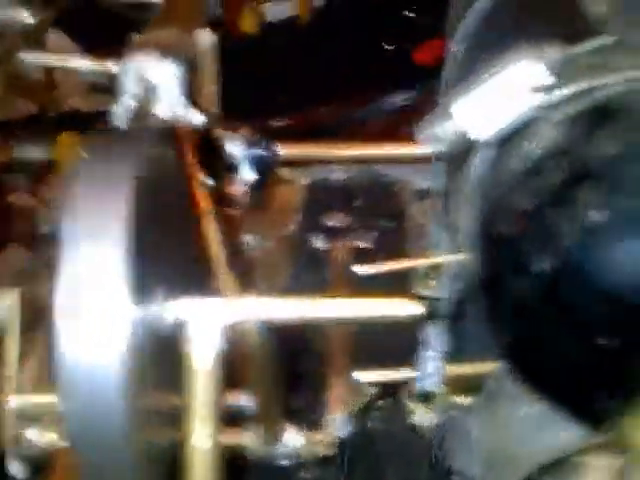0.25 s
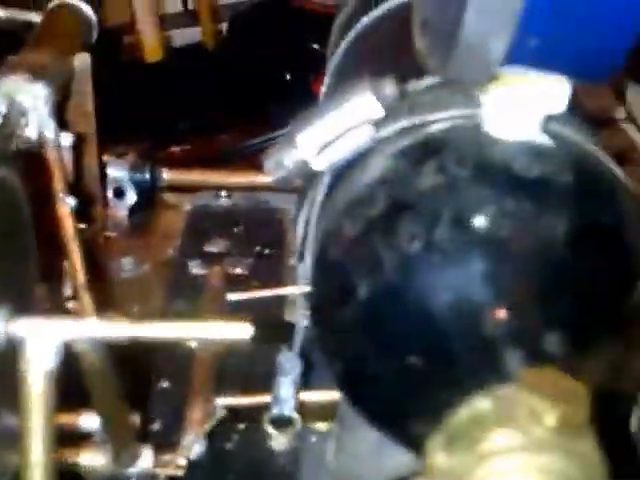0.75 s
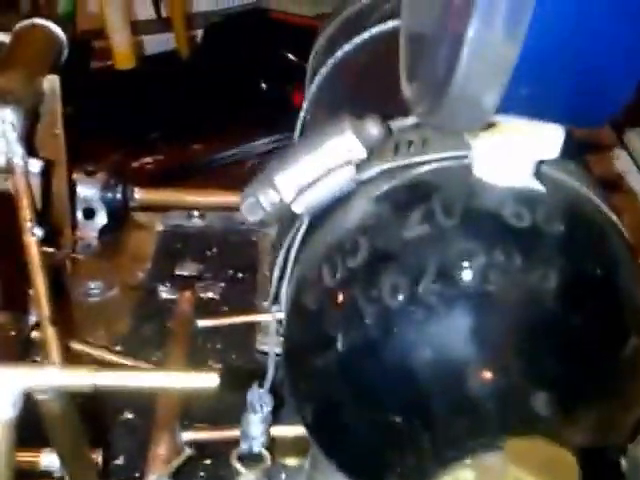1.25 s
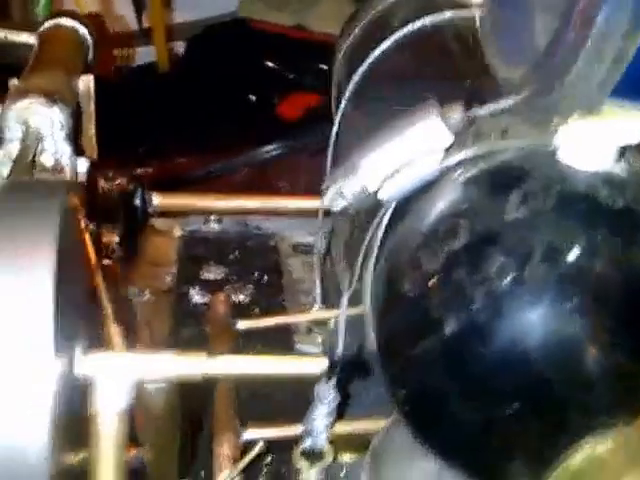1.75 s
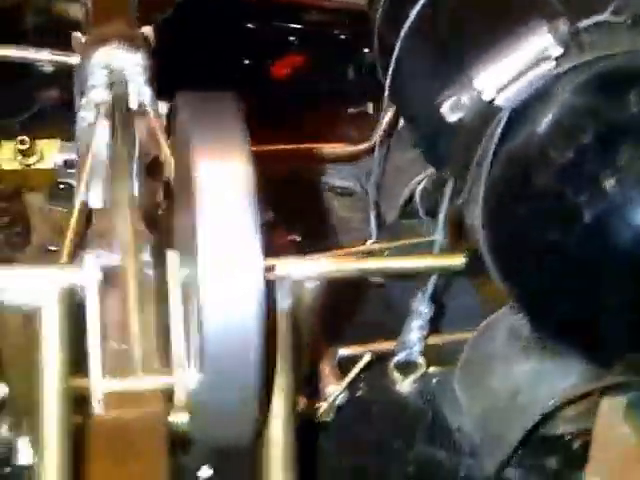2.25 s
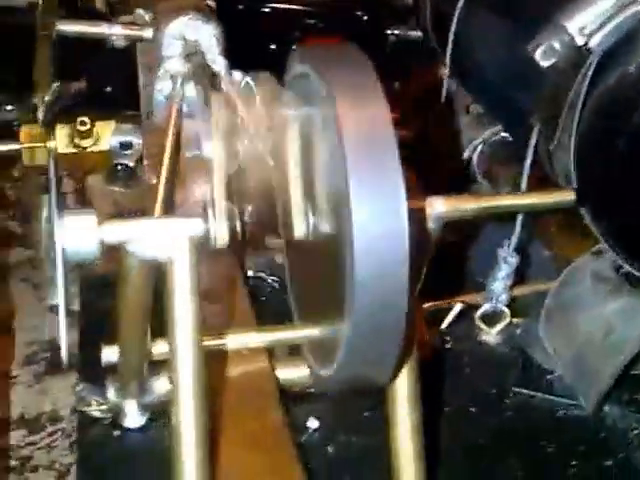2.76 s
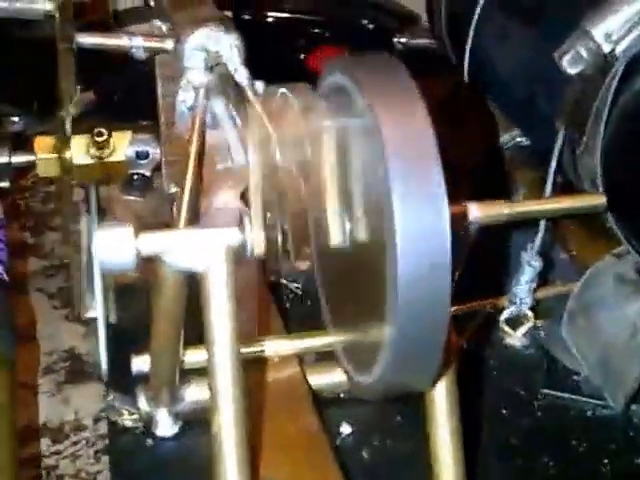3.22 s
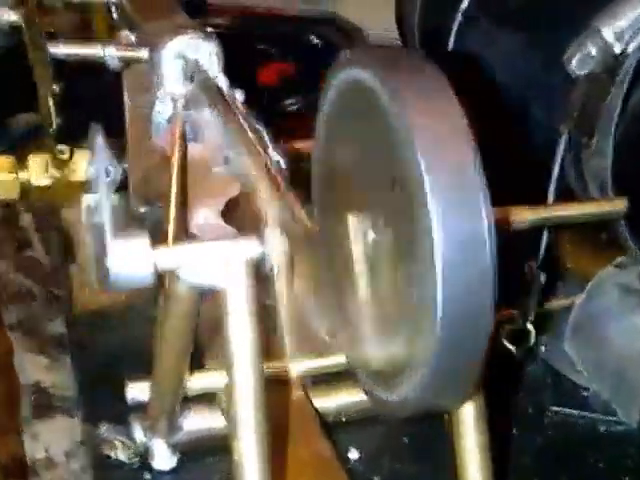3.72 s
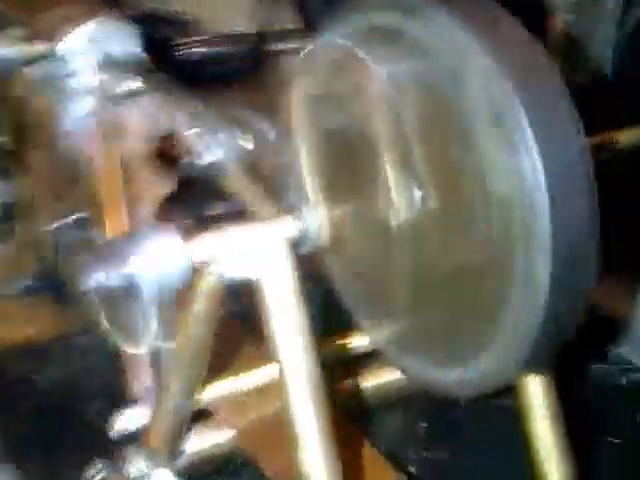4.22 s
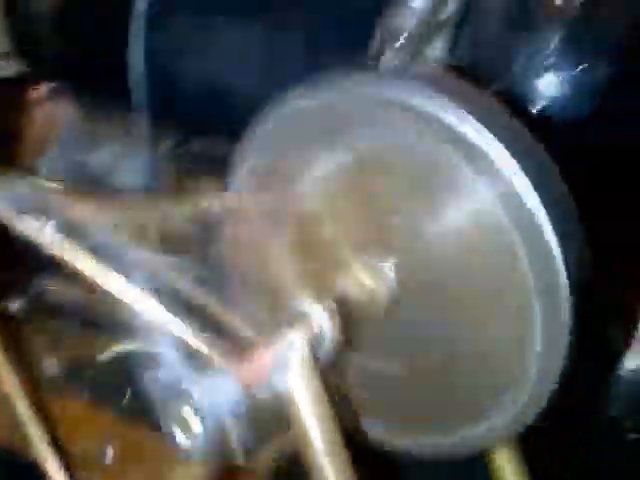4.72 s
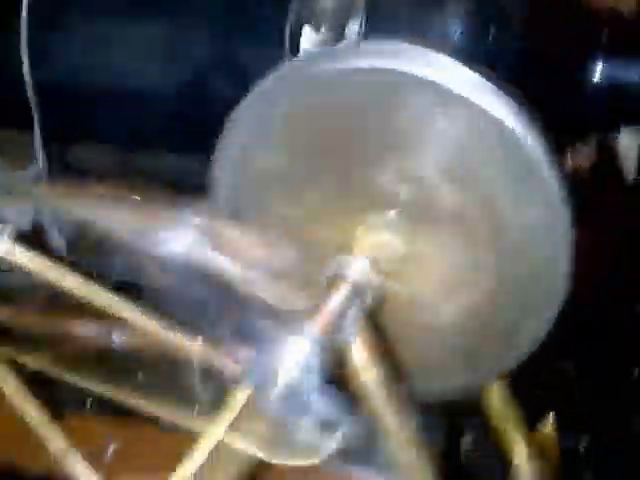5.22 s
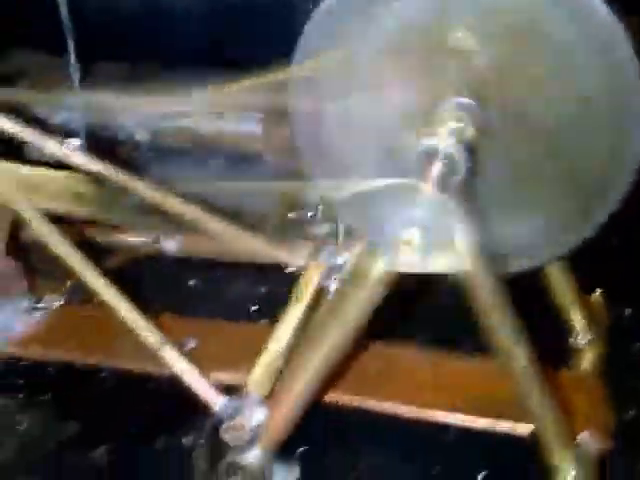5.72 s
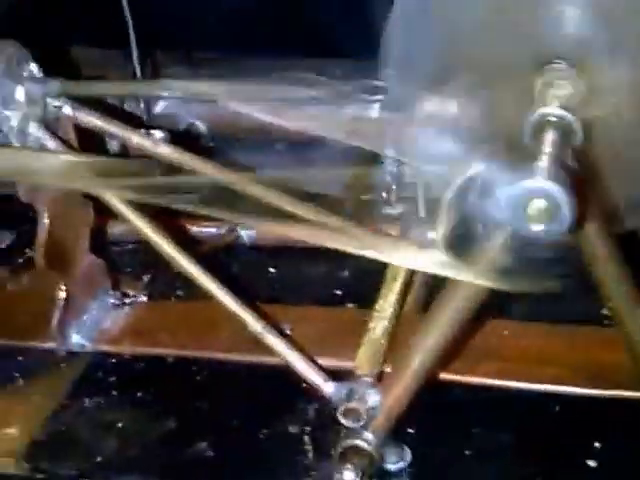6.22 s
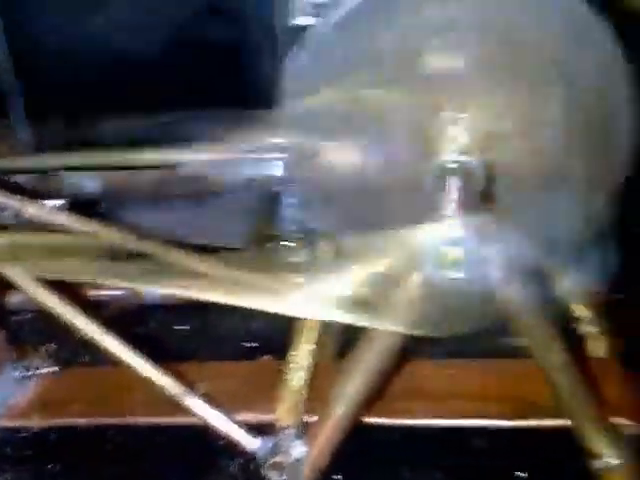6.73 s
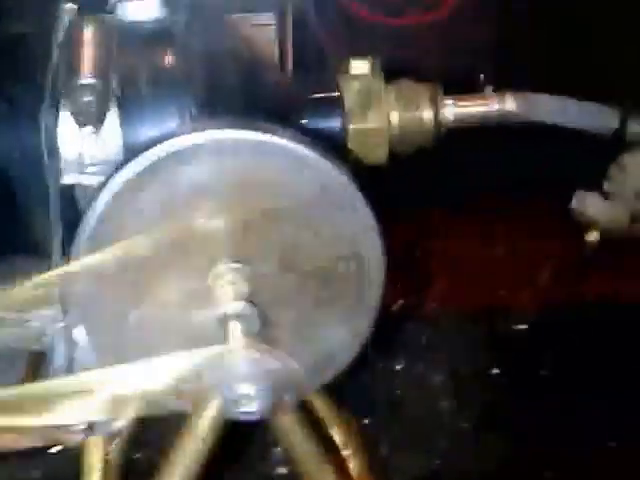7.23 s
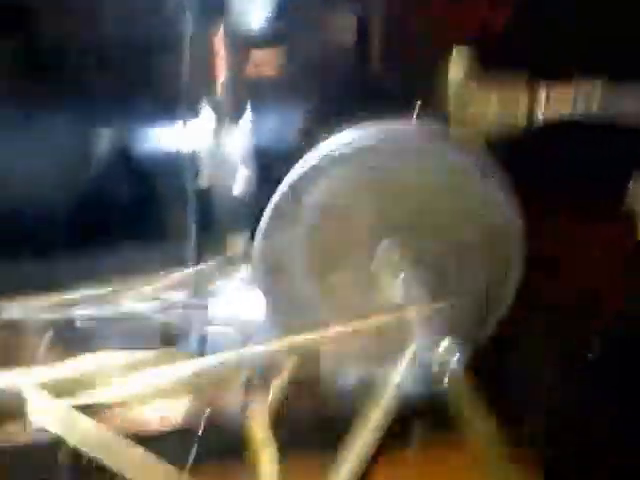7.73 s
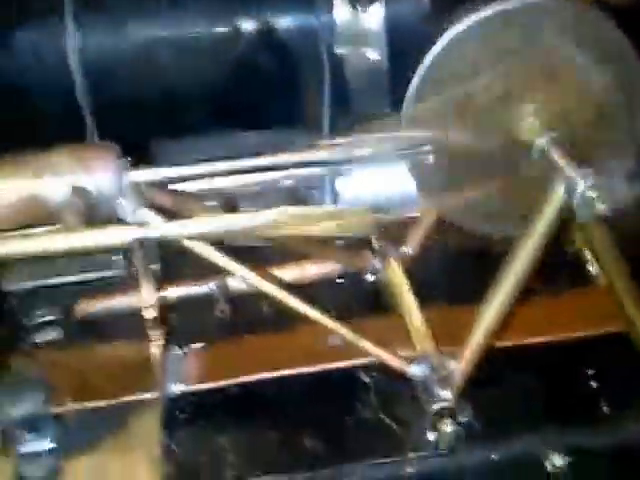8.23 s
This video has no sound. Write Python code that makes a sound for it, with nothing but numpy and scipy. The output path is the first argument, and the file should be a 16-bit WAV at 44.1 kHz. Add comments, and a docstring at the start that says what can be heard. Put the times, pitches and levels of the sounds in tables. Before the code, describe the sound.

A small homemade piston engine runs on compressed air at a workbench, with a fast, even clatter of loose metal joints, low valve thumps and hissing, faintly whistling exhaust puffs. A leak hisses underneath. For the first half, exhaust air buffets the close microphone. As it moves around the engine, the buffeting stops, squeaky spits and harder clacks come through, and a brighter rattle joins near the end.

```python
"""At a workbench, close up: a small homemade piston engine on compressed air, about 11 turns a second.
The microphone travels slowly around it. Each turn the valve thumps, the exhaust port spits, hisses and
whistles, and loose joints knock the base, frame, air tank and rods. An air fitting leaks throughout, and
the slide bars rattle as the microphone comes round to them. For the first four seconds the exhaust blows
on the microphone, and the strongest buffets duck the recorder's gain."""
import sys
import numpy as np
from scipy import signal
from scipy.fft import rfft, irfft, next_fast_len
from scipy.io import wavfile
from scipy.ndimage import uniform_filter1d, minimum_filter1d

SR = 44100
rng = np.random.default_rng(int(sys.argv[2]) if len(sys.argv) > 2 else 0)


def generate_wav(sig):
    """Save sig (samples, or channels by samples) to the path in sys.argv[1] as 16-bit PCM at SR."""
    pcm = np.round(np.clip(np.atleast_2d(sig).T, -1, 1) * 32767).astype(np.int16)
    wavfile.write(sys.argv[1], SR, pcm)


N = 373086
TIME = np.arange(N) / SR

# Levels in the tables are relative; each source may add its own gain.
# flywheel speed: t/s, speed/(turns per s)
FLYWHEEL_SPEED = [(0.0, 11.365), (0.9, 10.962), (2.5, 11.08), (3.4, 10.973), (4.3, 11.275), (5.4, 11.136),
                  (6.9, 11.304), (7.7, 10.896), (8.46, 10.84)]
# the two exhaust strokes of a turn: port opens/deg, shuts/deg, flow/dB, swell over the stroke/dB
EXHAUST_STROKES = [(5, 140, -0.5, 4.5), (154, 234, -2, -7)]

# loose draught around the microphone: t/s, level/dB
DRAUGHT_LEVEL = [(0, -25.5), (1.3, -36), (2.4, -26), (3.1, -41), (3.9, -43), (4.4, -43.5), (5.2, -48),
                 (8.46, -56.5)]
# its spectrum: f/Hz, level/dB
DRAUGHT_SPECTRUM = [(12, -34.5), (30, -13), (55, -1.5), (130, -0.5), (250, -6), (450, -14.5), (900, -51)]
# leak at the air fitting, from where the microphone is: t/s, level/dB
LEAK_LEVEL = [(0, -36), (2.3, -41.5), (4.5, -39.5), (5.8, -36), (6.8, -33.5), (7.4, -33.5), (8.0, -34.5),
              (8.46, -31)]
# its spectrum: f/Hz, level/dB
LEAK_SPECTRUM = [(40, -35), (300, -5.5), (1000, -3), (2600, -5), (3700, -6.5), (4600, -8), (5600, -6.5),
                 (6600, -9), (7500, -30.5)]
# its thin tone, heard near the cylinder: t/s, level/dB, f/Hz
LEAK_SINGING = [(0, -60, 4700), (5.3, -54, 4760), (6.1, -45, 4590), (6.9, -44.5, 4630), (7.6, -50.5, 4540),
                (8.46, -40, 4480)]
# puffs while the microphone stands in the exhaust jet: t/s, level/dB, eddy pitch/factor
JET_ON_MIC = [(0, -12.5, 0.65), (.45, -12.5, 0.49), (0.849, -23.5, 0.68), (1.35, -24, 0.66),
              (1.75, -18, 1.35), (2.1, -3, 1.34), (2.549, -5.5, 1.23), (2.95, -8.5, 1.16),
              (3.45, -10.5, 1.13), (3.951, -13.5, 1.18), (4.22, -30.5, 2)]
# single slaps of air on the microphone: t/s, level/dB, length/s, eddy pitch/factor
AIR_SLAPS = [(0.057, -14, 0.021, .76), (0.14, -8.5, 0.0072, 0.85), (0.497, -7.5, 0.0046, 0.62),
             (1.046, -10, 0.0073, .66), (1.775, -1.5, 0.0035, 1.34), (1.858, -11, 0.011, 0.32),
             (1.893, -7.5, 0.0057, 1.6), (1.95, -14, 0.033, 1.2), (2.044, -7, 0.0066, 0.44),
             (2.062, -3.5, 0.0057, 1.1), (2.239, -5.5, 0.0079, 1.3), (2.404, -1.5, 0.0013, 1.28),
             (3.22, -5.5, 0.0013, 1), (4.22, -26, 0.0078, 0.9), (4.487, -30.5, 0.008, 0.6)]

# slide bars, loud once the microphone is beside them: t/s, level/dB
RATTLE_LEVEL = [(0, -59.5), (6.8, -58.5), (7.4, -37.5), (7.85, -39), (8.05, -34), (8.46, -34.5)]
# their modes: f/Hz, width/Hz, level/dB
SLIDE_BAR_MODES = [(2250, 440, -8.5), (2730, 210, -6.5), (2940, 230, -10.5), (3590, 520, -4),
                   (4350, 450, -7.5)]
# valve thump at the microphone: t/s, level/dB
THUMP_LEVEL = [(0, -24.5), (2.4, -27.5), (3.8, -25.5), (4.6, -24.5), (6, -27), (7.4, -28.5), (8.46, -31)]
# its dry knock: low f/Hz, high f/Hz, decay/s (long and negative: almost flat), level against the thump/dB
VALVE_BURST = (231.5, 741, -2.3, -9)
# the port's regular spitting at the microphone: t/s, level/dB
SPIT_LEVEL = [(0, -61.5), (3.5, -45), (4.2, -33), (5.2, -35.5), (5.8, -37), (6.6, -53), (8.46, -39.5)]
# its hardest spits: t/s, peak level/dB, f/Hz
HARD_SPIT_EVENTS = [(3.949, -15, 4980), (4.037, -14, 4450), (4.217, -14, 4950), (4.631, -17, 4450),
                    (4.644, -16, 4700), (5.019, -15, 4450), (5.078, -11, 4780), (5.086, -14, 4900),
                    (5.348, -16, 4410)]
# exhaust along the microphone's path: t/s, hiss level/dB, whistle level/dB, whistle f/Hz
EXHAUST_AT_MIC = [(0, -35.5, -33.5, 5520), (1.4, -34.5, -28.5, 5505), (2.4, -36.5, -32.5, 5200),
                  (3.5, -35, -30.5, 5030), (4.3, -36.5, -28.5, 4800), (5.1, -33, -33.5, 4820),
                  (6, -37, -33.5, 4640), (7.3, -33.5, -49, 4360), (7.6, -37, -32.5, 5610),
                  (8.0, -38, -44, 5570), (8.46, -48, -37, 5250)]
# spectrum of its hiss: f/Hz, level/dB
HISS_SPECTRUM = [(60, -48), (400, -19.5), (1000, 4.5), (2500, -6.5), (3700, -6.5), (4500, -1), (5600, -1.5),
                 (6500, -2.5), (7200, -7), (7650, -27)]

# joints taking up their play each turn: crank angle/deg, level/dB for base, frame, rods, base note, links
JOINT_KNOCKS = [(58.34, 0, -1, -12, -2, -15.5), (72.31, -4.5, -1, -1, 1, -3), (97.2, -9, -0.5, -13, -5, -6),
                (123.1, -3.5, -0.5, -17, -6.5, -9.5), (151.4, -16, -3.5, -8.5, -11.5, -14.5),
                (177.5, -13.5, -7, -2, -7, -1), (206.1, -6.5, -4.5, -11, -4, -9.5),
                (229.5, 2.5, 1.5, 5.5, 0, 3), (243, 2.5, -1, -11, -0.5, 0), (301, -2, -4, -9, -5, -9),
                (318.4, 3, -3, -2, -1, 4), (356, -7.5, 1, -12.5, -2.5, -9.5)]
# modes of the base, frame, air tank and rods: f/Hz, width/Hz, level/dB
BASE_MODES = [(340, 490, -21), (484, 49, -12), (635, 88, -9.5), (750, 72, -7.5), (1080, 85, -24.5)]
FRAME_MODES = [(951, 200, -15.5), (1331.6, 236, 8), (1326.8, 229, 7), (1554, 450, -12)]
TANK_MODES = [(1898, 170, 11.5), (2110, 260, -0.5)]
ROD_MODES = [(2280, 380, -9), (2680, 190, -2.5), (2980, 260, -9.5), (3400, 300, -16)]
# how strongly each part reaches the moving microphone: t/s, level/dB for base, frame, tank, rods
PARTS_AT_MIC = [(0, -28, -27.5, -29.5, -41), (1.8, -30.5, -27.5, -30.5, -44), (2.7, -32.5, -29, -38, -39.5),
                (3.7, -35, -27.5, -40, -41), (4.8, -32.5, -32, -37, -36), (6.4, -36, -34, -34.5, -44.5),
                (7.25, -32.5, -36.5, -35, -41), (7.7, -34, -41, -57, -36), (8.46, -40, -38.5, -41, -35)]
# reflections of a knock against its direct sound: level/dB for base, frame, tank, rods
PART_ECHO_DB = (8, 10, 11, 4)
# clear notes of the base, connecting rod (strongest beside the crank) and valve links: t/s, level/dB, f/Hz
BASE_CLINK = [(0, -34, 816), (1.3, -34.5, 790), (2.7, -36.5, 817), (3.7, -36, 830), (4.7, -34.5, 846),
              (6, -36.5, 829), (7.4, -35.5, 823), (8.46, -42, 796)]
ROD_CLINK = [(0, -50, 2740), (4.5, -45.5, 2710), (6.6, -47, 2620), (7.15, -36.5, 2680), (7.6, -37.5, 2626),
             (8.46, -40, 2680)]
LINK_CLINK = [(0, -48, 3430), (1.3, -42.5, 3470), (2.4, -48, 3180), (4.0, -57, 3050), (5.3, -45.5, 3000),
              (6.6, -52, 3040), (7.6, -47, 3170), (8.46, -42, 2970)]
# harder clacks of the joints: t/s, peak level/dB, ringing f/Hz
HARD_CLACKS = [(0.4345, -14.5, 1890), (0.5274, -16, 1230), (0.62, -14, 1750), (0.7079, -13, 1960),
               (0.9803, -11, 1810), (1.0337, -14, 1990), (1.2472, -12, 1980), (1.303, -15, 1700),
               (1.343, -14, 2030), (1.4358, -18, 1890), (1.485, -15, 1450), (1.6169, -13, 1900),
               (1.9796, -12, 1830), (2.0279, -13, 1730), (4.376, -15, 1590), (4.5, -15.5, 1580),
               (4.553, -16, 1570), (4.715, -16.5, 1085), (4.823, -17, 1215), (4.923, -17, 1175),
               (4.999, -16, 885), (5.089, -17, 1195), (5.164, -16, 1190), (5.453, -18, 1185),
               (5.627, -16, 872), (5.806, -17, 880), (5.904, -17, 1205), (5.984, -18.5, 1590),
               (6.252, -18, 1550), (6.341, -17, 1075), (6.433, -16, 796), (6.519, -17, 1440),
               (6.615, -14.5, 850), (6.787, -16.5, 839), (6.874, -16.5, 855), (6.964, -15.5, 840),
               (7.272, -18, 1900), (7.1814, -22, 2640), (7.36, -22, 2720), (7.9577, -19, 3310),
               (8.0879, -21, 2600), (8.1138, -19, 3010), (8.1851, -20, 2590), (8.2774, -21, 2670)]
# modes of the whole engine under a hard clack: f/Hz, width/Hz, level/dB
ENGINE_MODES = [(850, 60, 0), (1085, 70, -3), (1210, 70, -1), (1430, 80, -1), (1590, 80, -3),
                (1950, 80, -2)]


def amp(db):
    """Decibels to gain."""
    return 10 ** (np.asarray(db) / 20)


def unit_rms(x):
    """Scales a signal to an rms of 1."""
    return x / np.sqrt(np.mean(x ** 2) + 1e-20)


def curve(rows, column=1):
    """One column of a table, joined by straight lines in time."""
    rows = np.array(rows)
    return np.interp(TIME, rows[:, 0], rows[:, column])


def add(mix, s, sound):
    """Mixes a sound in at time s."""
    part = mix[max(round(s * SR), 0):][:len(sound)]
    part += sound[:len(part)]


def band(x, low_hz, high_hz):
    """Keeps the range between two frequencies."""
    return signal.sosfilt(signal.butter(2, [low_hz, high_hz], "band", fs=SR, output="sos"), x)


def noise(spectrum):
    """Noise of unit rms with the given spectrum."""
    hz, db = np.transpose(spectrum)
    size = next_fast_len(N, True)
    gain = amp(np.interp(np.log(np.fft.rfftfreq(size, 1 / SR) + 1), np.log(hz), db))
    return unit_rms(irfft(rfft(rng.standard_normal(size)) * gain, size)[:N])


def resonate(x, hz, *widths_hz):
    """Resonances in series, one for each width, at a pitch that may move."""
    carrier = np.exp(2j * np.pi * np.cumsum(hz * np.ones(len(x))) / SR)
    for width in widths_hz:
        pole = np.exp(-np.pi * width / SR)
        x = 2 * (carrier * signal.lfilter([1 - pole], [1, -pole], x / carrier)).real
    return x


def mode(x, hz, width_hz):
    """One fixed mode of a part, driven by x."""
    return signal.lfilter(*signal.iirpeak(hz, hz / width_hz, SR), x)


def ring(x, modes):
    """A part's modes, alternating in sign; little radiates outside their range."""
    rung = sum((-1) ** k * amp(db) * mode(x, hz, width) for k, (hz, width, db) in enumerate(modes))
    return band(rung, 0.61 * modes[0][0], 1.47 * modes[-1][0])


def bench_echo(x, t60_s, wet_db, positions=80):
    """Adds dense reflections from the engine and bench; they change as the microphone travels."""
    t, step = np.arange(4096) / SR, N // (positions - 1)
    wet = np.zeros(N)
    for k in range(positions):
        paths = rfft(rng.standard_normal(len(t)) * amp(-60 * t / t60_s))
        # reflections ripple the spectrum finely but favour no whole band
        taps = irfft(paths / np.sqrt(uniform_filter1d(abs(paths) ** 2, size=24)))[:3072]
        near = np.arange(max((k - 1) * step, 0), min((k + 1) * step, N))
        fade = np.cos(np.pi / 2 * (near / step - k))
        add(wet, near[0] / SR, signal.fftconvolve(x[near] * fade, taps))
    return x + amp(wet_db) * wet


def crank_turns(first_opening_s=.0246):
    """Turns of the flywheel since the valve first opened."""
    turns = np.cumsum(curve(FLYWHEEL_SPEED)) / SR
    return turns - np.interp(first_opening_s, TIME, turns)


def crank_angle():
    """Degrees since the valve last opened."""
    return crank_turns() % 1 * 360


def times_at(degrees):
    """When the crank passes the given angle."""
    turns = crank_turns()
    times = np.interp(np.arange(-1, turns[-1]) + degrees / 360, turns, TIME)
    return times[(times > 0) & (times < TIME[-1])]


def each_turn():
    """A random value for every turn, joined by straight lines."""
    s = times_at(0)
    return np.interp(TIME, s, rng.standard_normal(len(s)))


def port_flow_db(edge_deg=2.4, seep_db=-8):
    """Air through the exhaust port: each stroke opens, swells or sags, and shuts; some always seeps past."""
    degrees = np.arange(360)
    power = amp(seep_db) ** 2
    for opens, shuts, db, swell_db in EXHAUST_STROKES:
        gap = np.clip(np.minimum(degrees - opens, shuts - degrees) / edge_deg + .5, 0, 1)
        flow = gap * amp(db + swell_db * (degrees - opens) / (shuts - opens))
        power = power + flow ** 2
    return np.interp(crank_angle(), degrees, 10 * np.log10(power))


def draught(flow_share=.45, lag_s=.018):
    """Spent air drifts past the microphone, rumbling just behind each exhaust stroke."""
    gusts_db = flow_share * np.interp(TIME - lag_s, TIME, port_flow_db())
    return unit_rms(noise(DRAUGHT_SPECTRUM) * amp(gusts_db)) * amp(curve(DRAUGHT_LEVEL))


def leak(width_hz=300):
    """Air escapes steadily at the fitting: a soft hiss and a thin tone."""
    tone = resonate(rng.standard_normal(N), curve(LEAK_SINGING, 2), width_hz, width_hz)
    hiss = noise(LEAK_SPECTRUM) * amp(curve(LEAK_LEVEL))
    return hiss + unit_rms(tone) * amp(curve(LEAK_SINGING))


def jet_puffs(arrival_deg=91, lag_deg_per_db=2.5, length_s=.014, length_spread=0.07, uneven_db=1.5):
    """One puff a turn while the microphone is in the jet, in rows like those of AIR_SLAPS."""
    jet_s, jet_db, jet_pitch = np.transpose(JET_ON_MIC)
    s = times_at(arrival_deg)
    strength, stretch = rng.standard_normal((len(s), 2)).T
    db = np.interp(s, jet_s, jet_db) + uneven_db * strength
    deg_per_s = 360 * np.interp(s, *np.transpose(FLYWHEEL_SPEED))
    arrival_s = s - lag_deg_per_db * db / deg_per_s  # weaker puffs travel slower
    rows = np.c_[arrival_s, db, length_s * np.exp(length_spread * stretch), np.interp(s, jet_s, jet_pitch)]
    return list(rows[s < jet_s[-1]])


def buffets(rise_s=0.00291, top_hz=255, band_ratio=5.5, brightening_per_db=0.011, gain_db=2.0):
    """Eddies hit the microphone; harder puffs are brighter, softer ones deeper."""
    out, t = np.zeros(N), np.arange(SR // 8) / SR
    for s, db, length, pitch in list(AIR_SLAPS) + jet_puffs():
        top = np.clip(top_hz * np.exp(brightening_per_db * db), 120, 340) * pitch
        eddies = band(rng.standard_normal(2 * len(t)), top / band_ratio, top)[len(t):]
        rise = np.minimum(t / rise_s, 1) ** 2
        fall = np.exp(-(np.maximum(t - rise_s, 0) / (1.72 * length)) ** 2)
        puff = eddies * rise * fall
        add(out, s - rise_s, amp(db + gain_db) * puff / abs(puff).max())
    return out


def slide_bar_rattle(clicks_per_s=300, spread_db=4):
    """Light, irregular clicks of the slide bars; each rings one of their modes."""
    bars = np.zeros(N)
    for hz, width, db in SLIDE_BAR_MODES:
        struck = rng.random(N) < clicks_per_s / len(SLIDE_BAR_MODES) / SR
        clicks = struck * amp(spread_db * np.clip(rng.standard_normal(N), -2, 2))
        bars += amp(db) * unit_rms(mode(clicks, hz, width))
    reflected = bench_echo(bars, t60_s=0.045, wet_db=-2)
    return unit_rms(band(reflected, 1700, 6300)) * amp(curve(RATTLE_LEVEL))


def valve_thumps(hz=170, width_s=0.0041, open_deg=-1, shut_deg=160, shut_db=-6, lead_s=0.003):
    """A dry knock and one swing of pressure when the valve opens, weaker ones when it shuts."""
    t = np.arange(-SR // 80, SR // 80) / SR
    kicks = np.zeros(N)
    kicks[(times_at(open_deg) * SR).astype(int)] = 1
    kicks[(times_at(shut_deg) * SR).astype(int)] = amp(shut_db)
    low_hz, high_hz, decay_s, knock_db = VALVE_BURST
    gate = (t > -lead_s) * np.exp(-abs(t + lead_s) / decay_s)  # almost flat, about 15 ms long
    knock_noise = unit_rms(band(rng.standard_normal(N), low_hz, high_hz))
    knocks = signal.oaconvolve(kicks, gate, "same") * knock_noise * amp(knock_db)
    swing = np.sin(2 * np.pi * hz * t) / np.cosh(2 * t / width_s)
    pressure = signal.oaconvolve(kicks, swing / swing.max(), "same")
    thumps = band(bench_echo(pressure, t60_s=.14, wet_db=-16), 82, 900)
    return (thumps + knocks) * amp(curve(THUMP_LEVEL))


def port_spits(open_deg=25, shut_deg=147, rise_deg=8, shut_db=-5, chuff_db=-12,
               hz=4560, width_hz=760, wander=.035, uneven_db=1.2):
    """Short squeaky bursts as the port cracks open and as it pinches shut, with a soft chuff between."""
    angle = crank_angle()
    age = np.maximum(angle - np.c_[[open_deg, shut_deg]], 0) / rise_deg
    opening, shutting = age * np.exp(1 - age)
    between = (angle > open_deg) & (angle < shut_deg)
    flow = opening + amp(shut_db) * shutting + amp(chuff_db) * between
    bursts = rng.standard_normal(N) * flow * amp(uneven_db * each_turn())
    pitch = hz * (1 + wander * each_turn())
    squeak = resonate(bursts, pitch, width_hz, width_hz)
    return unit_rms(band(squeak, 4050, 5600)) * amp(curve(SPIT_LEVEL))


def hard_spits(rise_s=0.0014, width_hz=700):
    """Now and then the port spits much harder: a brief burst of pitched noise."""
    out, age = np.zeros(N), np.arange(SR // 40) / SR / rise_s
    for s, db, hz in HARD_SPIT_EVENTS:
        burst = rng.standard_normal(len(age)) * age * np.exp(-age)
        squeak = resonate(burst, hz, width_hz, width_hz)
        add(out, s, amp(db) * squeak / abs(squeak).max())
    return out


def exhaust(hiss_db=3, whistle_db=-2.5, uneven_db=0.93, echo_gain=.36,
            width_hz=540, flow_share=.95, wander=.016):
    """Turbulent air gated by the port: a broad hiss and a breathy whistle that wanders from turn to turn."""
    hz = curve(EXHAUST_AT_MIC, 3)
    flow_db = port_flow_db() + uneven_db * each_turn()
    hiss = noise(HISS_SPECTRUM) * amp(flow_db)
    # a close reflection combs the hiss; its third crest lies on the whistle
    hiss = unit_rms(hiss + echo_gain * np.interp(TIME - 3 / hz, TIME, hiss))
    breath = rng.standard_normal(N) * amp(flow_share * flow_db)
    pitch = hz * (1 + wander * each_turn())
    whistle = unit_rms(resonate(breath, pitch, width_hz, width_hz))
    return (hiss * amp(hiss_db + curve(EXHAUST_AT_MIC))
            + whistle * amp(whistle_db + curve(EXHAUST_AT_MIC, 2)))


def hard_clacks(contact_s=.0015, q=17, click_db=-18, body_db=-4):
    """A joint strikes harder: a dry click, the short ring of one part, and the engine's modes under it."""
    out, t = np.zeros(N), np.arange(SR // 12) / SR
    for s, db, hz in HARD_CLACKS:
        blow = rng.standard_normal(len(t)) * np.exp(-t / contact_s)
        part = unit_rms(band(resonate(blow, hz, hz / q), hz / 2, hz * 1.33))
        click = amp(click_db) * unit_rms(band(blow, 1000, 3900))
        body = amp(body_db) * unit_rms(ring(blow, ENGINE_MODES))
        clack = part + click + body
        add(out, s, amp(db) * clack / abs(clack).max())
    return out


def clink(blows, track, width_hz):
    """One clear note of a part rings after each knock, as heard from the moving microphone."""
    rung = resonate(blows, curve(track, 2), width_hz, 7 * width_hz)
    return unit_rms(rung) * amp(curve(track))


def joint_clatter(jitter_s=.0007, uneven_db=1.0, chatter_s=.0016, scrape_db=-3, slide_db=-7.0,
                  part_db=(-5, 0, -1.5, -1.5)):
    """Each loose joint knocks at its own crank angle and chatters briefly; all parts ring with it."""
    blows = np.zeros((5, N))
    for degrees, *reach_db in JOINT_KNOCKS:
        s = times_at(degrees)
        late, strength = rng.standard_normal((len(s), 2)).T
        at = np.clip(np.round((s + jitter_s * late) * SR).astype(int), 0, N - 1)
        blows[:, at] += amp(reach_db)[:, None] * amp(uneven_db * strength)
    base, frame, rods, base_note, links = blows
    # the air tank is shaken through the frame
    parts = [(base, BASE_MODES), (frame, FRAME_MODES), (frame, TANK_MODES), (rods, ROD_MODES)]
    pole = np.exp(-1 / (chatter_s * SR))
    out = np.zeros(N)
    for k, (blow, modes) in enumerate(parts):
        # the chatter swells and dies after each knock
        chatter = np.sqrt(abs(signal.lfilter([1], np.poly([pole, pole]), blow ** 2 + 1e-12)))
        scrape, slide = rng.standard_normal((2, N))
        knocks = unit_rms(bench_echo(blow, t60_s=.048, wet_db=PART_ECHO_DB[k]))
        drive = knocks + amp(scrape_db) * unit_rms(chatter * scrape) + amp(slide_db) * slide
        out += unit_rms(ring(drive, modes)) * amp(part_db[k] + curve(PARTS_AT_MIC, k + 1))
    out += clink(base_note, BASE_CLINK, width_hz=75)
    out += clink(rods, ROD_CLINK, width_hz=105)
    return out + clink(links, LINK_CLINK, width_hz=140)


def scene(fade_s=.003):
    """The engine, its escaping air and the wind it makes, at one close, moving microphone."""
    metal = joint_clatter() + hard_clacks() + slide_bar_rattle()
    strokes = exhaust() + port_spits() + hard_spits() + valve_thumps()
    air = leak() + draught() + buffets()
    fade = np.clip(np.minimum(TIME, TIME[-1] - TIME) / fade_s, 0, 1)
    return ((metal + strokes + air) * fade)[None]


def record(dry, ceiling_db=-6.0, hold_s=.028, recovery_db_per_s=170, cutoff_hz=7800):
    """The recorder's fast limiter ducks after a strong buffet, holds and recovers; a low-pass follows."""
    over_db = np.maximum(20 * np.log10(abs(dry[0]) + 1e-9) - ceiling_db, 0)
    hold = int(hold_s * SR)
    held_db = -minimum_filter1d(-over_db, size=hold, origin=(hold - 1) // 2)
    recovery_db = TIME * recovery_db_per_s
    duck_db = uniform_filter1d(np.maximum.accumulate(held_db + recovery_db) - recovery_db, size=40)
    low_pass = signal.firwin(301, cutoff_hz, window=("kaiser", 8), fs=SR)
    return signal.oaconvolve(dry * amp(-duck_db), low_pass[None], "same")


dry = scene()
out = record(dry)
generate_wav(out)
```